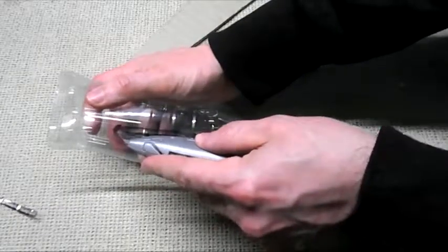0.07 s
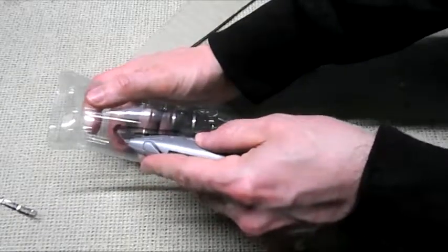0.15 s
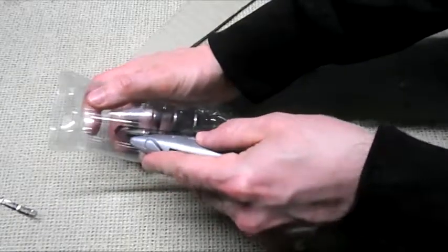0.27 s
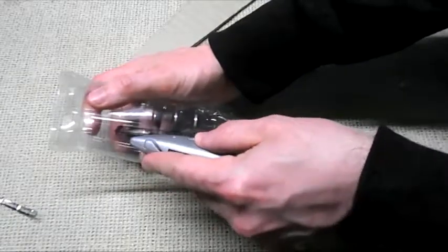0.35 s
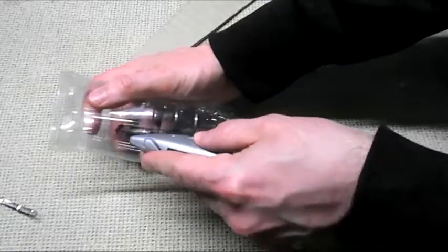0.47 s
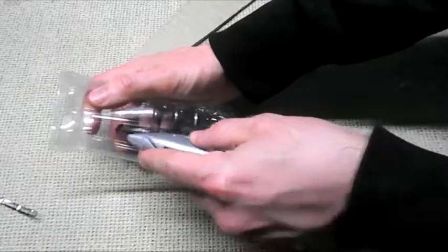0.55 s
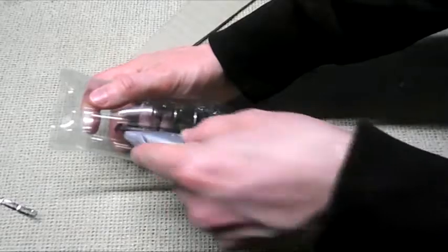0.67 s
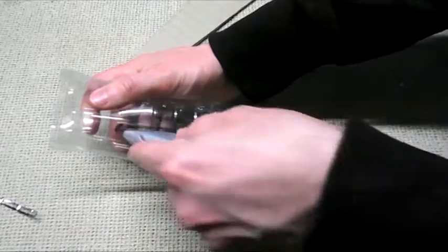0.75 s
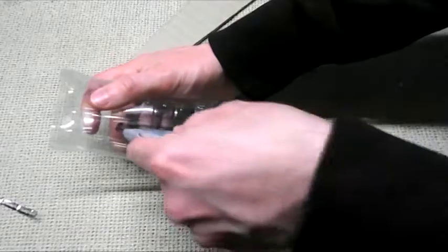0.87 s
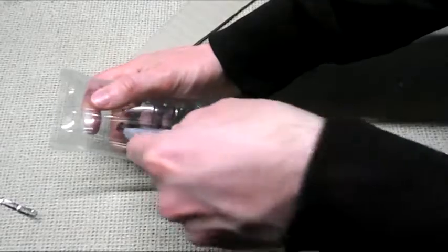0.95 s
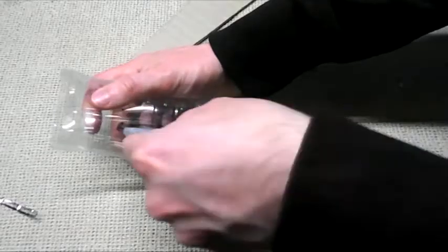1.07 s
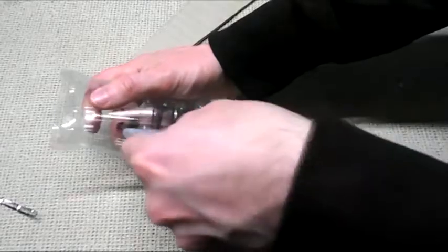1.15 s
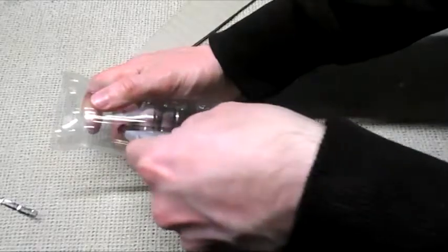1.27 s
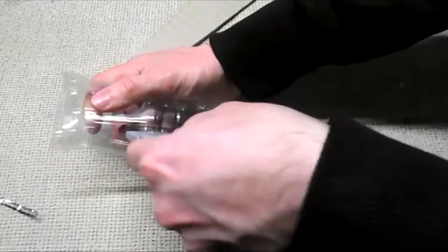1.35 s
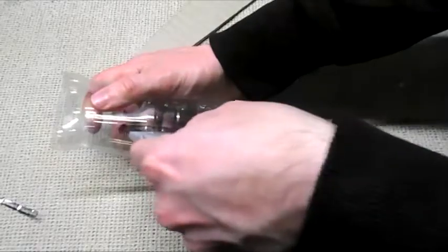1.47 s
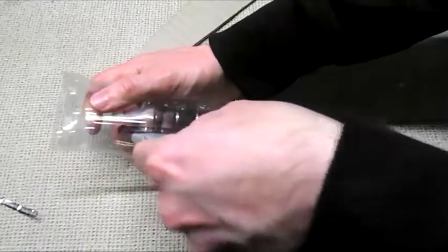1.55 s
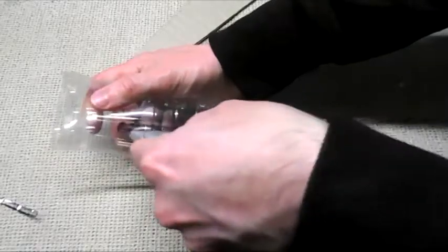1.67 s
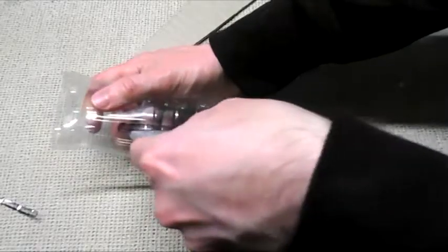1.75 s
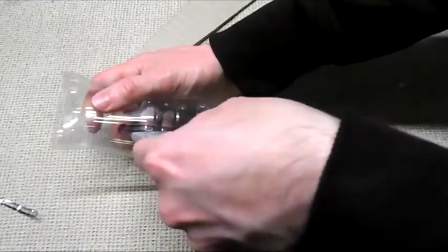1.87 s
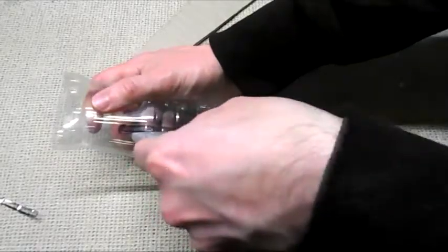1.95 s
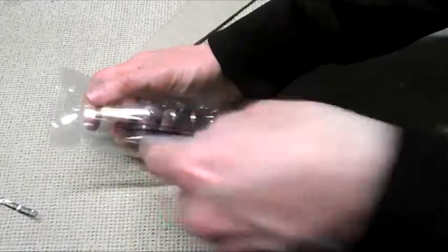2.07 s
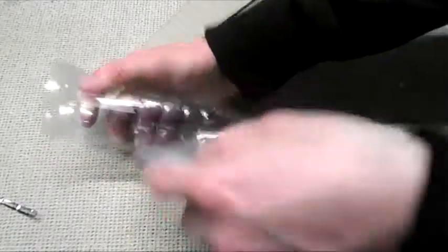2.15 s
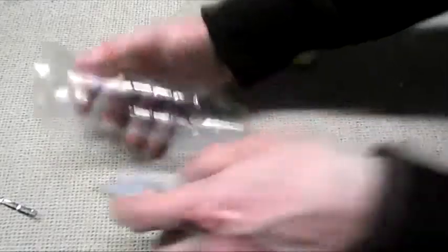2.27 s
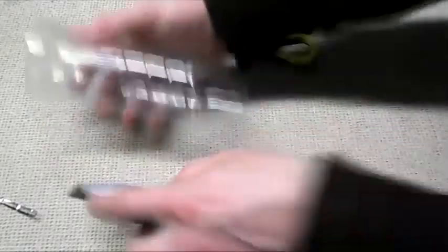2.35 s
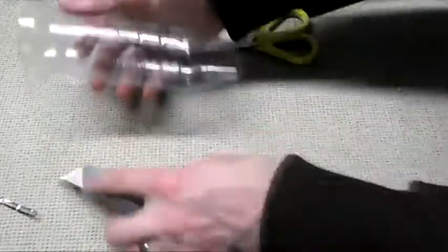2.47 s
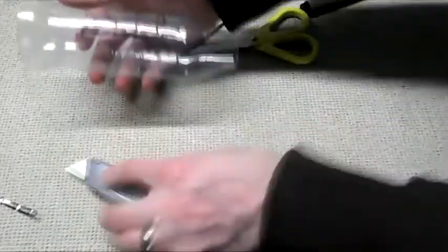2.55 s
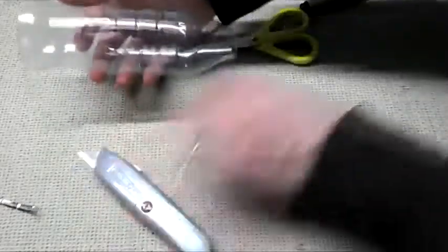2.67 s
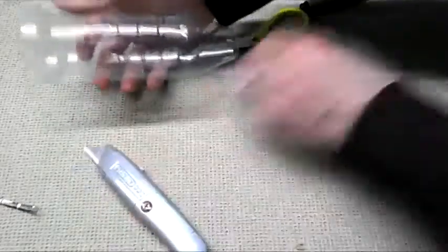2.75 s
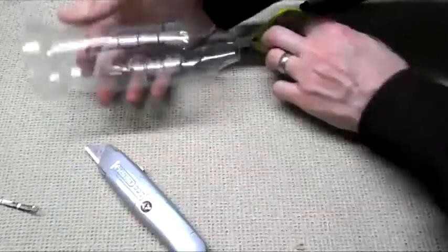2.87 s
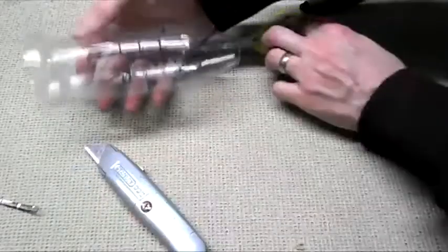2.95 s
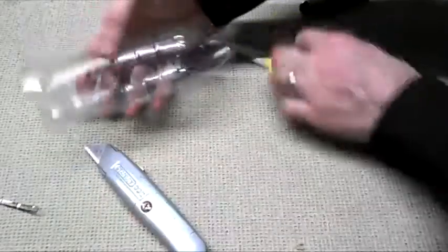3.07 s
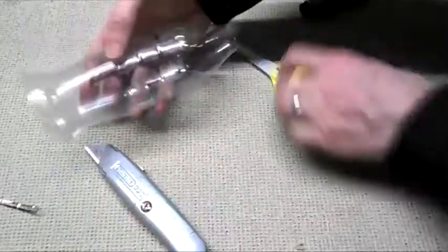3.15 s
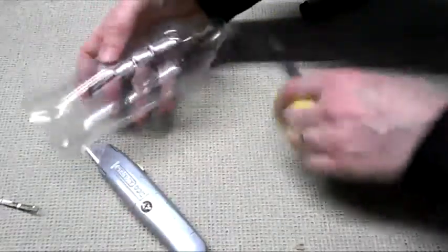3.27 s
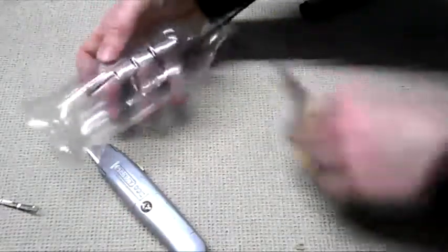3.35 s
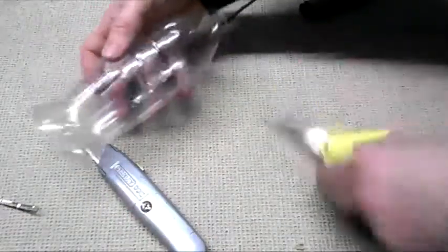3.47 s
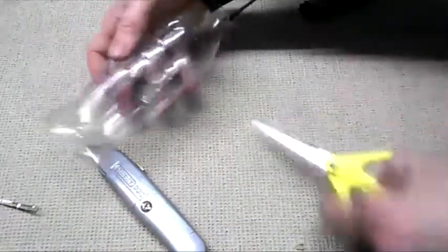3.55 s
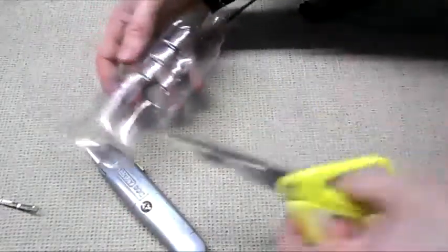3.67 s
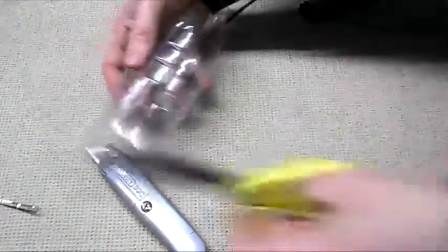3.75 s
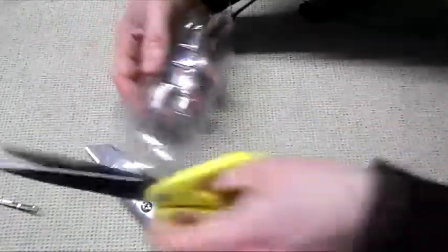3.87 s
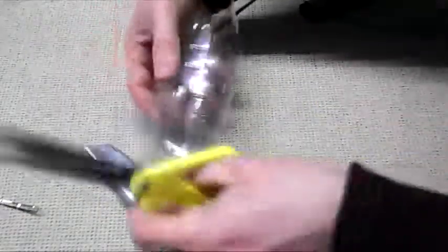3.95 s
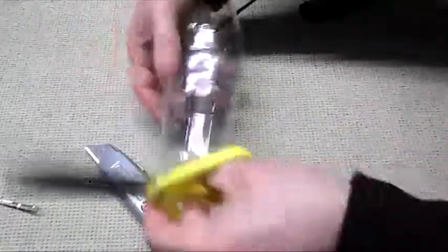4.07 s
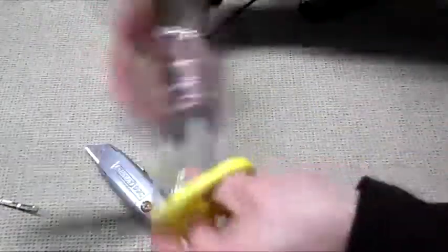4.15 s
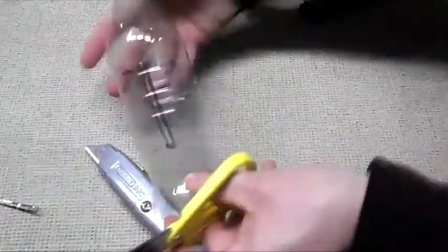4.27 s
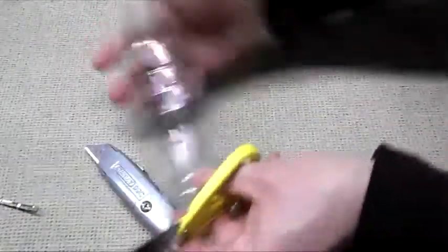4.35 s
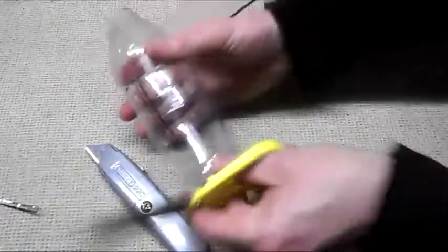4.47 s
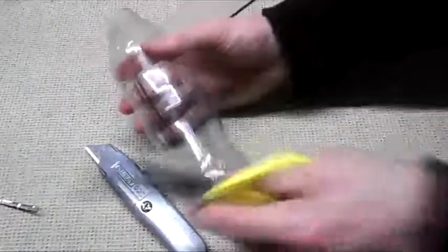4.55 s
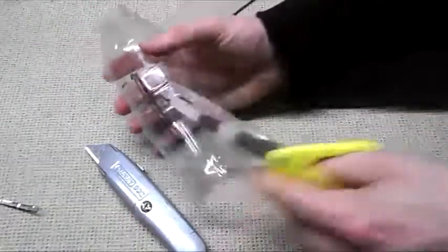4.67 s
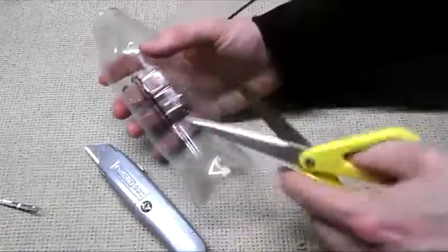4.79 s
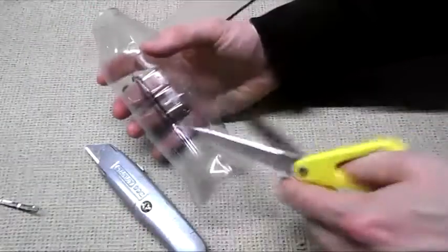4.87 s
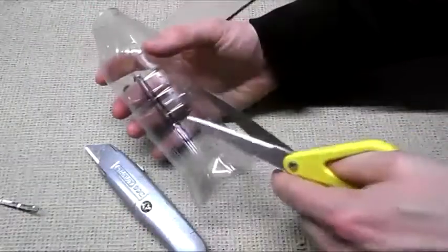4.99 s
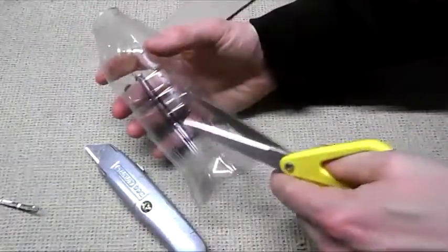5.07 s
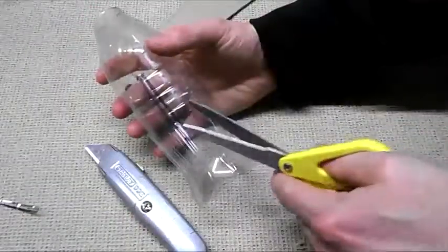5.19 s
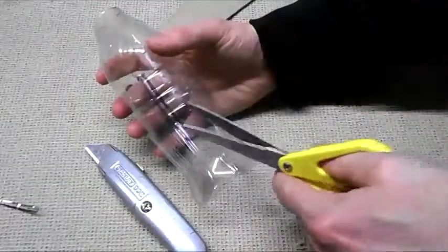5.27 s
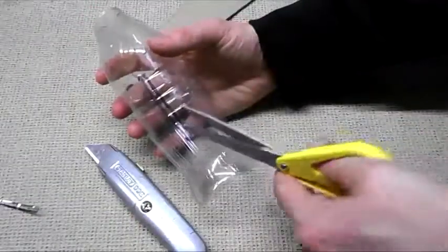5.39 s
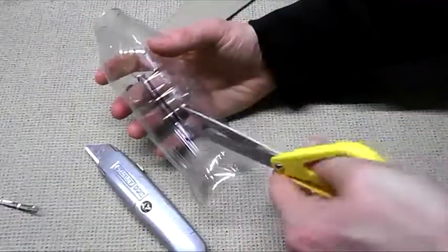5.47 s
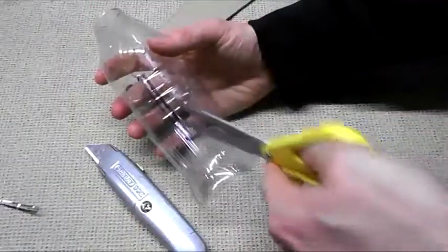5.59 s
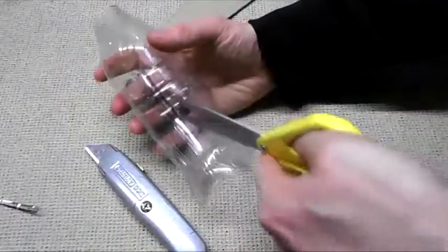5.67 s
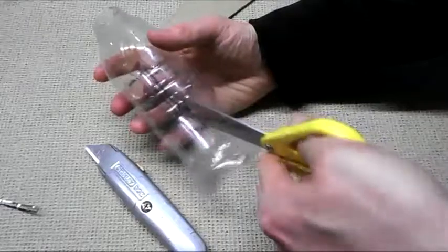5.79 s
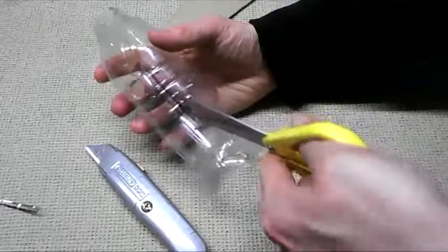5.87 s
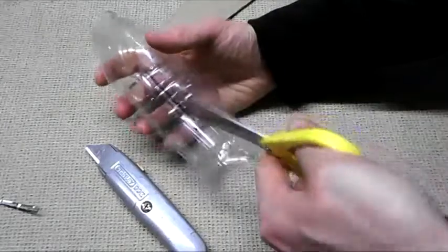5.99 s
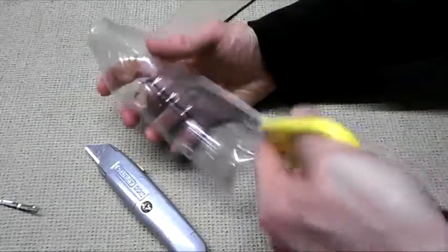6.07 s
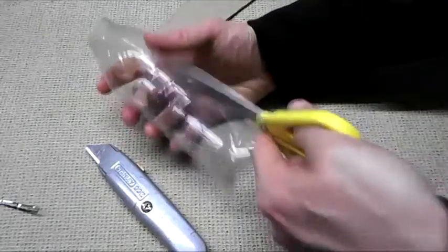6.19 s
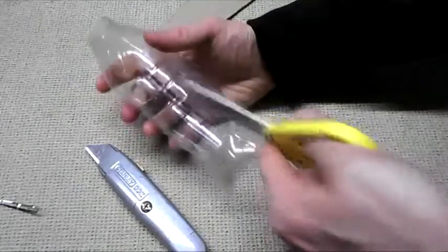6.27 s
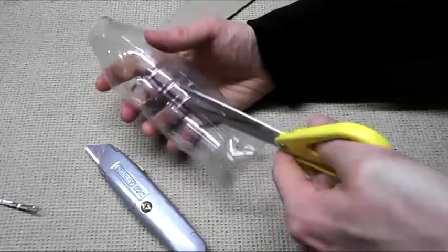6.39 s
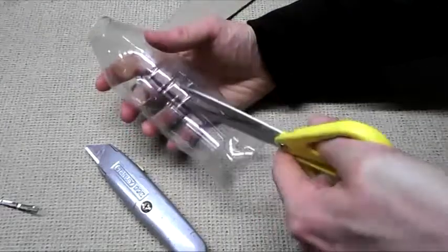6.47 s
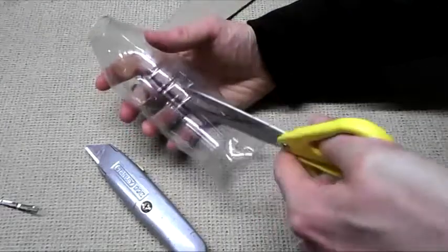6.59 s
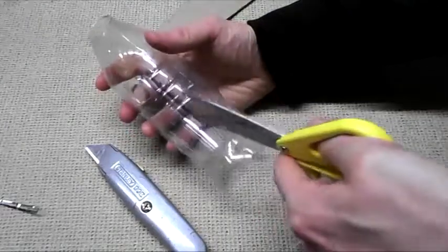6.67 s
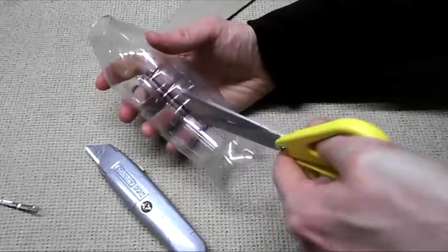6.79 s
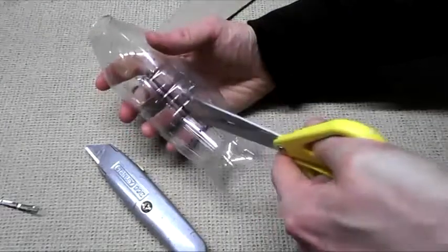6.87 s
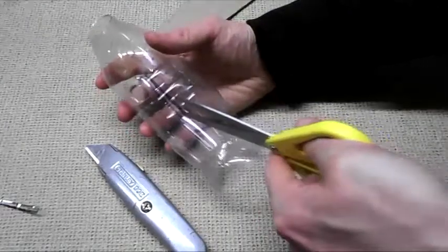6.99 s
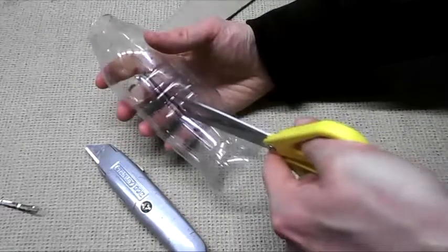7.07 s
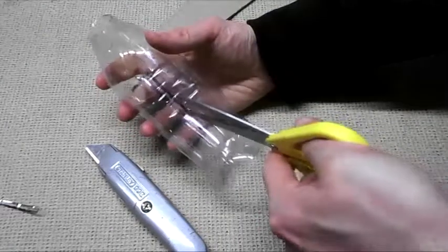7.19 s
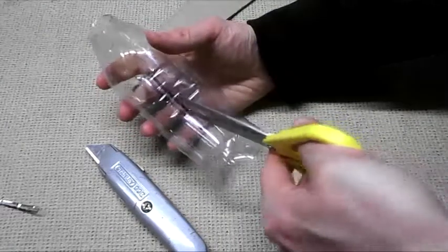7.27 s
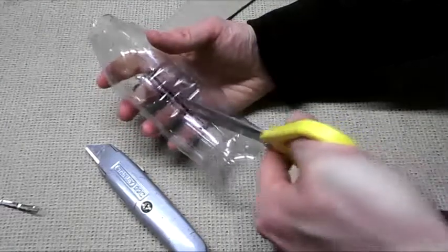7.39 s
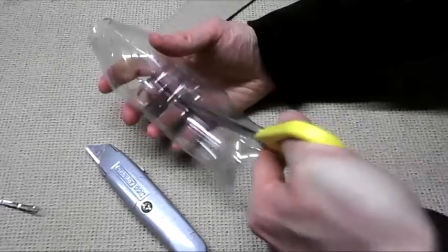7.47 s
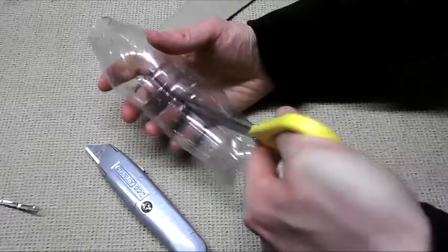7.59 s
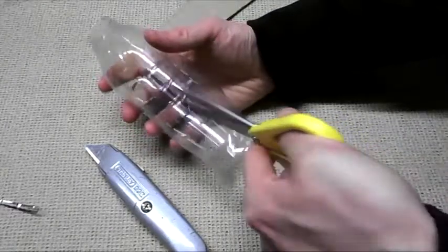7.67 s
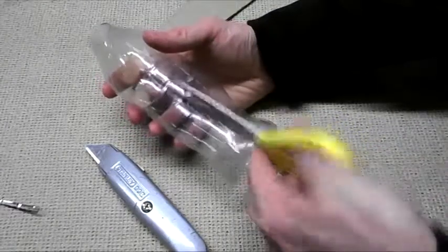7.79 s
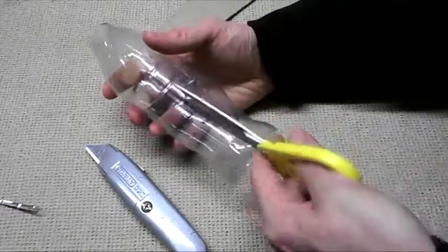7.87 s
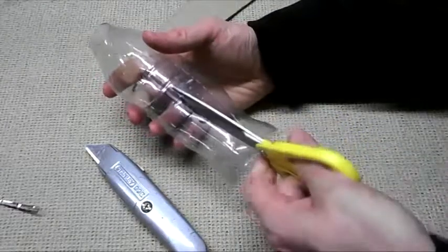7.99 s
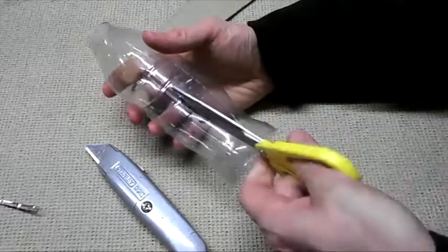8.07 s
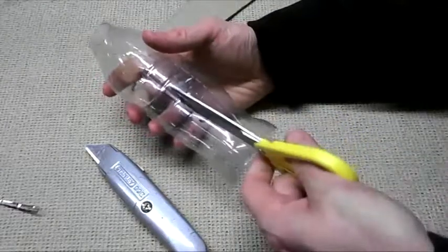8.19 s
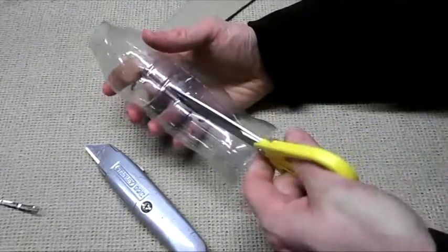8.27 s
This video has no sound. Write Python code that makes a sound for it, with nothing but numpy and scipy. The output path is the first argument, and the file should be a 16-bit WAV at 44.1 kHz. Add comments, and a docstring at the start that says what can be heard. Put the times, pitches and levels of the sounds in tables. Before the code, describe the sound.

A utility knife cuts into a thin plastic bottle, with a sharp crack at about 0.3 seconds, then short, fine rasps, scattered snaps and a faint scratchy squeak. A loud pop comes at 2.2 seconds. From 2.5 to 2.8 the metal knife clinks and rattles down onto a cloth-covered table with a soft thud. Between 3 and 3.6 a hand drags and bumps quietly across the cloth. From 3.8 to about 5.3 the bottle is handled, giving irregular crackles, light finger brushes and a brief steel squeak. Scissors cut from 5.6 onward in short, hollow crunches mixed with snaps and faint blade squeaks. The wall buckles with loud pops at 7.2 and 7.5, and snaps sharply again around 8. The microphone is close, with slightly dull treble, and dips briefly after the loudest pops. The room is small and quiet, with a light, short echo.

```python
"""Cutting up a plastic bottle

A utility knife slits a thin bottle and is laid on a cloth-covered table; a hand drags, scissors cut on.
The wall crackles under the blades, snaps, and now and then buckles with a loud, hollow pop.
Steel clinks and squeaks, fingers brush the plastic, and a small room answers.
The close microphone ducks after loud pops and has a rippled, dull treble."""
import sys
import numpy as np
from scipy import signal
from scipy.fft import rfft, irfft, next_fast_len
from scipy.io import wavfile
from scipy.ndimage import map_coordinates

SR = 44100
rng = np.random.default_rng(int(sys.argv[2]) if len(sys.argv) > 2 else 0)


def master_out(mix):
    """Clip the mix to full scale and print it as 16-bit PCM to the path in sys.argv[1]."""
    frames = np.transpose(np.atleast_2d(mix))
    ceiling = np.clip(frames, -1, 1)
    pcm = np.round(ceiling * 32767).astype(np.int16)
    wavfile.write(sys.argv[1], SR, pcm)


N = 367353
TIME = np.arange(N) / SR
AGE = TIME[:SR // 3]  # seconds into a one-shot


def amp(db):
    """Decibels to gain."""
    return 10 ** (np.asarray(db) / 20)


def unit(x):
    """Normalise to rms 1."""
    return x / np.sqrt(np.mean(x ** 2) + 1e-20)


def along(points, hz):
    """Read (frequency, value) breakpoints on a log axis."""
    f, v = np.transpose(points)
    return np.interp(np.log(hz + 1), np.log(f), v)


def filtered(x, response):
    """EQ with a complex response of frequency."""
    size = next_fast_len(len(x) + 8192)
    return irfft(rfft(x, size) * response(np.fft.rfftfreq(size, 1 / SR)), size)[:len(x)]


def noise(spectrum, size=N):
    """Coloured noise at rms 1."""
    return unit(filtered(rng.standard_normal(size), lambda hz: amp(along(spectrum, hz))))


def resonate(x, peaks):
    """A resonator bank of alternating polarity, output at rms 1."""
    def response(f):
        return sum((-1) ** k * amp(db) * 1j * f * width / (hz * hz - f * f + 1j * f * width)
                   for k, (hz, width, db) in enumerate(peaks))
    return unit(filtered(x, response))


def wobble(rate):
    """A smooth random modulator, rate knots a second."""
    return map_coordinates(rng.standard_normal(int(N * rate / SR) + 4), [TIME * rate], order=2)


def ring(modes, scatter_db, detune):
    """Damped modes with fresh level, tuning and polarity on every hit."""
    out = np.zeros(len(AGE))
    for hz, db, t60 in modes:
        strength, drift, polarity = rng.standard_normal(3)
        decay = amp(db + scatter_db * strength - 60 * AGE / t60)
        out += np.sign(polarity) * decay * np.sin(2 * np.pi * hz * (1 + detune * drift) * AGE)
    return out


def pressure(strokes, peak_share):
    """Envelope: each (start, length, level) stroke swells until peak_share of its length, then lets go."""
    out = np.zeros(N)
    for start, length, db in strokes:
        span = slice(round(start * SR), round((start + length) * SR))
        progress = np.interp((TIME[span] - start) / length, [0, peak_share, 1], [0, .5, 1])
        out[span] += amp(db) * np.sin(np.pi * progress)
    return out


def add(track, s, sound):
    """Drop a one-shot in at s seconds."""
    part = track[round(s * SR):][:len(sound)]
    part += sound[:len(part)]


LIFT_S, LIFTED_TUNING = 2.4, 1.054
def tuning_at(s):
    """Pitch factor of the hollow modes: they ring higher once the slit bottle is lifted."""
    return LIFTED_TUNING if s > LIFT_S else 1


# bottle modes: f/Hz, level/dB, ring time factor
WALL_MODES = [(292, -27, 0.74), (690, -11, 3.6), (775, -0.5, 2.2), (873, -4, 1.8), (1170, 0, 1.2),
              (1730, 1, 1.7), (2113, 5, 0.7), (2698, 2.5, 0.9), (3400, 6, 0.8), (4150, 5.5, 0.8),
              (4750, 4, 0.5), (5350, -3, 0.55)]
# colour of a crack's noise burst: f/Hz, level/dB
CRACK_EQ = [(40, -36), (130, -18), (300, 4), (800, -6), (2000, 7), (4200, 7), (6000, -1), (12000, -6.5)]
def wall_snap(body_db, t60, crack_db, tuning, neutral_db=-14, hollow_top_hz=1000):
    """A crack rings the bottle; the further the wall moves, the hollower and duller it sounds."""
    def tilt_db(hz):
        return (body_db - neutral_db) * along([(350, 0.22), (800, 1), (1700, 0.24), (4200, -0.23)], hz)
    modes = [(hz * (tuning if hz < hollow_top_hz else 1), db + tilt_db(hz), t60 * ringing)
             for hz, db, ringing in WALL_MODES]
    tone = ring(modes, scatter_db=2.0, detune=0.045)
    burst = noise(CRACK_EQ, size=len(AGE)) * amp(-60 * AGE / (1.91 * t60))
    attack = 1 - np.exp(-AGE / 0.00061)  # the crack takes a moment to run
    return attack * (0.34 * tone + amp(crack_db) * filtered(burst, lambda hz: amp(tilt_db(hz))))


# the wall cracks at the blade: t/s, level/dB, hollow body/dB
SNAP_CUES = [(0.087, -40.5, -49), (0.286, -15.5, -30), (0.418, -34, 0.5), (0.582, -31, -13),
             (0.6654, -23.5, 1.5), (0.74, -16, -13.5), (1.247, -36.5, -8), (2.132, -18, -5),
             (3.82, -35, -19), (3.834, -30, -9), (3.857, -25.5, -13), (4.062, -20, -8), (4.19, -22, -15),
             (4.2, -24, -36), (4.302, -31.5, -8), (4.481, -18.5, -23), (4.513, -27, -29),
             (4.552, -26.5, -6.5), (4.6, -28.5, -7.5), (4.831, -28.5, -42), (5.136, -25, -6),
             (5.228, -35, -18), (5.247, -20.5, -8), (5.668, -32, 0), (5.7, -30, -11), (5.736, -28, 1),
             (5.859, -31, -1), (6.021, -30, -1.5), (6.037, -24, -6.5), (6.137, -14, -18),
             (6.166, -19.5, -13), (6.203, -17.5, -13), (6.23, -23.5, 0), (6.321, -22, -3),
             (6.501, -24.5, -6), (6.702, -38.5, -5.5), (6.777, -20, -17.5), (6.785, -14.5, -9.5),
             (7.105, -35, 6.5), (7.127, -27, -15), (7.829, -27.5, -1), (8.011, -31, 2), (8.029, -10, -17),
             (8.054, -30, 9)]
def snaps(gain_db=-3.5):
    """Tight snaps as the bottle wall suddenly lets go."""
    out = np.zeros(N)
    for s, db, body_db in SNAP_CUES:
        snap = wall_snap(body_db, t60=0.014, crack_db=-2.0, tuning=tuning_at(s))
        add(out, s, amp(db + gain_db) * snap)
    return out


def crackling(rate, body_db, spots=6):
    """Tiny random cracks from several spots on the wall, each with a ring of its own."""
    out = np.zeros(N)
    for _ in range(spots):
        cracks = (rng.random(N) < rate / spots / SR) * np.tanh(rng.standard_normal(N))
        snap = wall_snap(body_db, t60=0.028, crack_db=-2.5, tuning=LIFTED_TUNING)
        out += signal.fftconvolve(cracks, snap)[:N]
    return unit(out)


# bright bite of a scrape: f/Hz, width/Hz, level/dB
EDGE_PEAKS = [(1753, 570, 1), (2410, 260, 0.5), (3400, 480, 1), (3820, 530, 2), (4950, 750, -5.5)]
def scrape(strokes, body, tear_rate, body_db, edge_db, fizz_db, crackle_db, peak_share,
           crackle_rate=55, crack_body_db=-15.5):
    """A blade advances by clumps of tiny, uneven tears that ring the wall; now and then one cracks."""
    tears = (rng.random(N) < tear_rate / SR) * rng.standard_normal(N)
    drive = (unit(tears) + 0.47 * rng.standard_normal(N)) * amp(3 * wobble(110))
    warped_time = TIME + .004 * wobble(16)  # the flexing wall bends its resonances
    hollow = amp(body_db) * np.interp(warped_time, TIME, resonate(drive, body))
    edge = amp(edge_db) * resonate(drive, EDGE_PEAKS)
    fizz = amp(fizz_db) * resonate(drive, [(5400, 2600, 0.015), (12500, 4900, 0.0076)])
    crackle = amp(crackle_db) * crackling(crackle_rate, crack_body_db)
    force = pressure([(s, length, db) for s, length, db, _ in strokes], peak_share)
    flex = pressure([(s, length, db + hollow_db) for s, length, db, hollow_db in strokes], peak_share)
    skim = pressure([(s, length, db - hollow_db) for s, length, db, hollow_db in strokes], peak_share)
    return force * (edge + crackle) + flex * hollow + skim * fizz  # a light touch only hisses


# pushes along the slit: t/s, length/s, level/dB, hollowness/dB
KNIFE_CUES = [(.277, 0.033, -32.5, -4), (.295, 0.055, -40.5, -9), (.34, 0.11, -55, 9.5),
              (.56, 0.36, -46.5, 0.5), (1.54, 0.14, -44, -1.5), (2.075, .15, -34.5, 1.5),
              (2.18, 0.01, -22, 3)]
# body of the closed bottle: f/Hz, width/Hz, level/dB
CLOSED_BOTTLE = [(291.4, 93, -17), (710, 78, 8), (1110, 160, -8.5)]
def knife_slitting():
    """The knife tears through the closed bottle with a fine-grained rasp."""
    return scrape(KNIFE_CUES, CLOSED_BOTTLE, tear_rate=2000, peak_share=0.42,
                  body_db=-2.5, edge_db=-2, fizz_db=-18.0, crackle_db=-5.0)


def swing(hz, q):
    """One heavily damped swing, peak 1."""
    resonator = signal.iirpeak(hz, max(q, .6), fs=SR)
    impulse = 1. * (AGE == 0)
    motion = signal.lfilter(*resonator, signal.lfilter(*resonator, impulse))
    return motion / np.abs(motion).max()


# panel pops: t/s, level/dB, centre/Hz, skirt/(dB/octave), thump/dB, cavity/dB, ring time factor
BUCKLE_CUES = [(0.3043, -9, 2070, 19, -25, -25, 1.5), (1.188, -38, 1750, 22, -36, -8, 2.8),
               (1.2652, -22.5, 1490, 20, -11, 4, 1.7), (1.6969, -10.5, 2750, 8.5, -37, -25, 0.65),
               (2.1906, 13, 2755, 6.4, -16.5, -47, 0.54), (5.243, -15.5, 2270, 21, -34, -15.5, 0.33),
               (6.1366, -10, 3100, 7.1, -22, -6, 2.3), (7.2228, 1.5, 1360, 30, -35, -18, 1.15),
               (7.5453, 8.5, 940, 6.2, -23, -10, 1.25), (7.5485, 9.5, 2300, 8.4, -30.5, -29, 0.87)]
# swings of a flipping panel: f/Hz, level/dB, Q
PANEL_MODES = [(920, 5.5, 0.97), (1770, 2.5, 3.6), (3440, 13.5, 1.47)]
def buckles(shudder_db=-15):
    """A panel turns inside out, rings the hollow and shakes the wall; a small panel pops higher."""
    out = np.zeros(N)
    for s, db, centre_hz, skirt_db, thump_db, cavity_db, ringing in BUCKLE_CUES:
        pop = np.zeros(len(AGE))
        for k, (hz, mode_db, q) in enumerate(PANEL_MODES):
            weight = amp(mode_db - skirt_db * abs(np.log2(hz / centre_hz)))
            pop += (-1) ** k * weight * swing(hz, q * ringing)
        thump = amp(thump_db) * swing(hz=268, q=0.99)  # the whole bottle jerks
        crease_click = amp(-7.5) * swing(hz=10100, q=0.6)
        cavity = amp(cavity_db) * swing(hz=760 * tuning_at(s), q=3.6)
        shudder = amp(shudder_db) * wall_snap(body_db=-8.5, t60=0.017, crack_db=1.5, tuning=tuning_at(s))
        add(out, s, amp(db) * (pop / np.abs(pop).max() + thump + crease_click + cavity + shudder))
    return out


# partials of the singing knife: f/Hz, level/dB
SING_PARTIALS = [(1717, -4), (2121, -2), (2568, -3), (2875, 0), (3680, 3), (3978, -8), (4580, -1),
                 (5560, -8.5)]
def knife_singing(start_s=1.063, length_s=0.21, level_db=-50.5, width_hz=42):
    """The knife sticks and slips in the slit: one thin, scratchy tone."""
    friction = rng.standard_normal(N) * amp(wobble(91))
    tone = resonate(friction, [(hz, width_hz, db) for hz, db in SING_PARTIALS])
    rasp = amp(2.2 * wobble(240))
    return pressure([(start_s, length_s, level_db)], peak_share=0.42) * unit(tone * rasp)


# the knife settles on the table: t/s, level/dB, centre/Hz, skirt/(dB/octave), chatter/dB
CLINK_CUES = [(2.5058, -9, 5100, 12, -5.5), (2.513, -10, 2510, 28, -2), (2.6315, -17, 4650, 5, 5),
              (2.6453, -5, 4670, 13.5, 3.5), (2.6617, -6, 4500, 31, -2), (2.717, -19, 5200, 12, 5),
              (2.7309, -11.5, 3400, 42, -2.5), (2.734, -10, 6260, 6, -3), (2.774, -14, 5240, 10, -6),
              (2.786, -16.5, 4860, -1, -8)]
# steel handle modes: f/Hz, level/dB, t60/s
HANDLE_MODES = [(1830, -5, 0.11), (2380, 0, 0.085), (2850, -7, 0.09), (3410, 1, 0.11), (4400, -3, 0.07),
                (4650, 0, 0.05), (4990, -4, 0.06), (5480, -1, 0.065), (5950, -3, 0.04), (6280, -2, 0.035),
                (7700, -8, 0.09), (9100, -3, 0.06), (10850, -6, 0.033)]
def knife_down(gain_db=-6, chatter_t60=0.054):
    """The handle rings, each contact favouring other modes, while the loose blade chatters inside."""
    out = np.zeros(N)
    cloth_damping = .25 + amp(-60 * AGE / .05)
    for s, db, centre_hz, skirt_db, chatter_db in CLINK_CUES:
        modes = [(hz, mode_db - skirt_db * abs(np.log2(hz / centre_hz)), t60)
                 for hz, mode_db, t60 in HANDLE_MODES]
        tone = ring(modes, scatter_db=2.5, detune=.008) * cloth_damping
        chatter = noise([(800, -16.5), (2500, 2), (5000, 1.5), (12000, -8)], size=len(AGE))
        chatter *= amp(chatter_db - 60 * AGE / chatter_t60)
        add(out, s, amp(db + gain_db) * (1.16 * tone / np.abs(tone).max() + 0.53 * chatter))
    return out


# table top modes: f/Hz, level/dB, t60/s
TABLE_MODES = [(129.6, -19.5, 0.68), (187.7, -6, 0.27), (226, -9.5, 0.13), (320, 3, 0.034),
               (554, 10.5, 0.012)]
# colour of the cloth: f/Hz, level/dB
CLOTH_EQ = [(30, -35), (250, -15), (600, 4.5), (1500, -0.5), (2600, -2), (4700, -5.5), (6200, -17),
            (12000, -23)]
def knock(tap_db, thud_db, tap_t60, tap_trim_db=-9):
    """A soft tap on the cloth over the thud of the table top."""
    tap = noise(CLOTH_EQ, size=len(AGE)) * amp(-60 * AGE / tap_t60)
    thud = ring(TABLE_MODES, scatter_db=1.5, detune=0.05)
    return amp(tap_db + tap_trim_db) * tap + amp(thud_db) * thud


# landings on the table: t/s, tap/dB, thud/dB
BUMP_CUES = [(2.625, -3.5, -21), (2.998, -13, -32.5), (3.34, -15, -29)]
# low end of the table: f/Hz, level/dB
RUMBLE_EQ = [(40, -30), (90, -8), (190, 1), (320, 2.5), (500, -5), (900, -9), (3000, -50.5)]
def table_bumps(shake_db=-8.5, shake_t60=0.34):
    """A hand or tool lands on the padded table, which rumbles on under the thud."""
    out = np.zeros(N)
    for s, tap_db, thud_db in BUMP_CUES:
        shake = noise(RUMBLE_EQ, size=len(AGE)) * amp(thud_db + shake_db - 60 * AGE / shake_t60)
        add(out, s, knock(tap_db, thud_db, tap_t60=0.01) + shake)
    return out


# moves across the cloth: t/s, length/s, rumble/dB, rub/dB
DRAG_CUES = [(2.982, 0.081, -46.5, -45.5), (3.055, 0.37, -48.5, -38.5), (3.311, 0.11, -34, -43),
             (3.416, 0.18, -43, -42.5)]
def cloth_drags(peak_share=0.23):
    """A hand or sleeve catches on the weave and sets the table rumbling."""
    rumble = noise(RUMBLE_EQ)
    rub = unit(noise(CLOTH_EQ) * amp(3 * wobble(250)))
    rumble_swell = pressure([(s, length, db) for s, length, db, _ in DRAG_CUES], peak_share)
    rub_swell = pressure([(s, length, db) for s, length, _, db in DRAG_CUES], peak_share)
    return rumble_swell * rumble + rub_swell * rub


def hand_judder(start_s=3.457, first_gap_s=0.0114, slowing=1.03, slips=12):
    """The dragged hand sticks and slips to a stop in a slowing run of knocks."""
    out = np.zeros(N)
    for slip in range(slips):
        gaps = np.sum(slowing ** np.arange(slip)) + .12 * rng.standard_normal()
        grip = amp(rng.normal(0, 1.5))
        add(out, start_s + first_gap_s * gaps, grip * knock(tap_db=-18.5, thud_db=-36.5, tap_t60=0.023))
    return out


# one breakpoint curve per squeak: t/s, f/Hz, level/dB
SQUEAK_CURVES = [
    [(3.69, 2380, -59), (3.725, 2404, -54), (3.8, 2300, -73)],
    [(4.85, 6600, -56), (4.862, 5700, -35.5), (4.869, 4840, -51)],
    [(6.21, 3200, -62), (6.29, 3380, -49), (6.36, 3230, -50.5), (6.43, 3160, -64), (6.49, 3240, -49),
     (6.57, 2950, -67)],
]
def blade_squeaks():
    """Steel sticks and slips in thin, wavering glides."""
    out = np.zeros(N)
    for curve in SQUEAK_CURVES:
        s, hz, db = np.transpose(curve)
        pitch = np.interp(TIME, s, hz) * (1 + 0.008 * wobble(45))
        envelope = amp(np.interp(TIME, s, db, left=-np.inf, right=-np.inf))
        out += envelope * np.sin(2 * np.pi * np.cumsum(pitch) / SR)
    return out


# faint sliding hiss: t/s, length/s, level/dB
SLIDE_CUES = [(3.72, 0.14, -53), (3.962, 0.043, -44), (4.0, 0.83, -58), (4.81, 0.048, -39)]
# colour of the hiss: f/Hz, level/dB
HISS_EQ = [(600, -1), (5000, -0.5), (11000, -1.5)]
def airy_slides():
    """A faint, airy, uneven hiss slides along under the handling."""
    return pressure(SLIDE_CUES, peak_share=0.71) * unit(noise(HISS_EQ) * amp(2.5 * wobble(70)))


# handling noise: t/s, length/s, level/dB, hollowness/dB
BRUSH_CUES = [(3.815, 0.14, -46, -0.5), (4.036, 0.05, -36, -1.5), (4.15, 0.056, -45.5, 5.5),
              (4.215, 0.053, -45.5, -17), (4.472, 0.041, -34.5, 4.5), (4.56, 0.18, -52, 6.5)]
# body of the slit bottle: f/Hz, width/Hz, level/dB
OPEN_BOTTLE = [(319, 175, -13.5), (808, 130, 0.5), (960, 230, -5)]
def brushes():
    """Fingers and blades brush the bottle as it is turned."""
    return scrape(BRUSH_CUES, OPEN_BOTTLE, tear_rate=800, peak_share=0.44,
                  body_db=-4.5, edge_db=0.0, fizz_db=-18.5, crackle_db=-2)


# scissor bites: t/s, length/s, level/dB, hollowness/dB
CUT_CUES = [(5.62, 0.26, -45, -2), (5.84, 0.13, -48, -3), (6.105, 0.11, -29.5, 0.5), (6.26, 0.097, -48, 6),
            (7.02, 0.18, -51, 1.5), (7.56, 0.15, -35.5, 0.5), (7.77, 0.17, -53, -1.5),
            (7.965, 0.11, -42, -0.5)]
def scissor_cuts():
    """The scissors close on the wall with a coarse, hollow crunch."""
    return scrape(CUT_CUES, OPEN_BOTTLE, tear_rate=600, peak_share=0.28, body_db=1.0, edge_db=-3,
                  fizz_db=-21.5, crackle_db=-5, crackle_rate=95, crack_body_db=-5.5)


# blade slides over blade: t/s, length/s, level/dB
SHEAR_CUES = [(6.79, 0.084, -58), (7.96, 0.072, -53)]
# scissor blade resonances: f/Hz, width/Hz, level/dB
BLADE_PEAKS = [(4270, 150, 1), (4680, 260, -7)]
def scissor_shears():
    """Steel rubs on steel and sets the blades ringing."""
    return pressure(SHEAR_CUES, peak_share=0.31) * resonate(rng.standard_normal(N), BLADE_PEAKS)


# reverb decay: f/Hz, t60/s
ROOM_DECAY = [(150, 0.15), (800, 0.27), (4000, 0.24), (10000, 0.2)]
def room(x, build_s=0.0032):
    """A diffuse tail builds over the first reflections; each band dies at its own speed."""
    hz, t, bands = signal.stft(rng.standard_normal(SR // 2), SR, nperseg=256)
    colour_db = along([(150, 2.0), (900, 2.0), (4500, 2.5), (10000, 0.5)], hz)[:, None]
    decay = amp(colour_db - 60 * t / along(ROOM_DECAY, hz)[:, None])
    _, tail = signal.istft(bands * decay * (1 - np.exp(-t / build_s)), SR, nperseg=256)
    return signal.oaconvolve(x, tail / np.linalg.norm(tail))[:N]


def shifting_reverb(x, stretches=17):
    """Each stretch gets a fresh tail: the room's fine pattern shifts as hands and bottle move."""
    stretch = np.arange(N) * stretches // N
    return sum(room(x * (stretch == k)) for k in range(stretches))


# room tone: f/Hz, level/dB
ROOM_TONE_EQ = [(25, -3.5), (130, -5), (200, 0.5), (350, -2.5), (800, -7), (4000, -18), (6000, -25.5),
                (11000, -25)]
def scene():
    """Mono mix: bottle, table and tools up close, over light reverb and quiet room tone."""
    close = snaps() + buckles() + knife_slitting() + brushes() + scissor_cuts()
    close += knife_down() + cloth_drags() + table_bumps() + hand_judder()
    close += knife_singing() + blade_squeaks() + scissor_shears() + airy_slides()
    return (close + amp(-12.5) * shifting_reverb(close) + amp(-57.5) * noise(ROOM_TONE_EQ))[None]


def gain_control(x, threshold_db=-9, release_db_per_s=190, attack_s=0.0021):
    """The gain ducks fast on a loud peak and climbs back steadily, holding up the room's tail."""
    over_db = np.maximum(20 * np.log10(np.abs(x) + 1e-9) - threshold_db, 0)
    recovery_db = release_db_per_s * TIME
    held_db = np.maximum.accumulate(over_db + recovery_db) - recovery_db
    pole = np.exp(-1 / (attack_s * SR))
    return x * amp(-signal.lfilter([1 - pole], [1, -pole], held_db))


# the microphone's rippled treble: f/Hz, level/dB
MIC_EQ = [(5800, 0.5), (6500, -7.5), (7000, -23.5), (7400, -10.5), (8000, -11), (8500, -24.5), (9100, -13),
          (10000, -23.5), (10500, -12), (11400, -13), (12100, -38.5), (12800, -24.5), (13600, -39)]
def record(dry, ceiling=.78, low_cut_hz=85, top_hz=14900):
    """Microphone chain: ducking, soft clip, low cut, rippled treble and band limit."""
    x = gain_control(dry[0])
    x = x / (1 + (x / ceiling) ** 6) ** (1 / 6)
    x = signal.sosfilt(signal.butter(3, low_cut_hz, "high", fs=SR, output="sos"), x)
    return filtered(x, lambda hz: amp(along(MIC_EQ, hz)) * (hz < top_hz))[None]


dry = scene()
out = record(dry)
master_out(out)
```